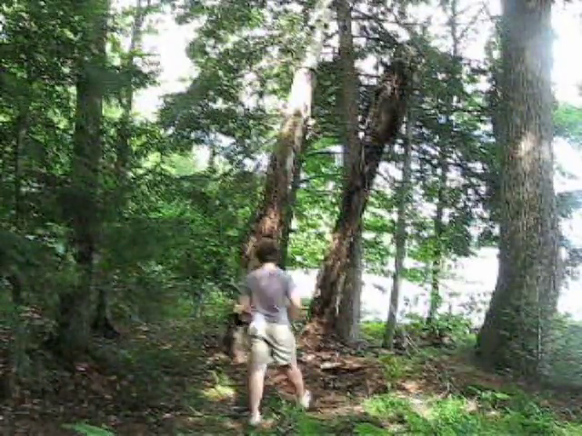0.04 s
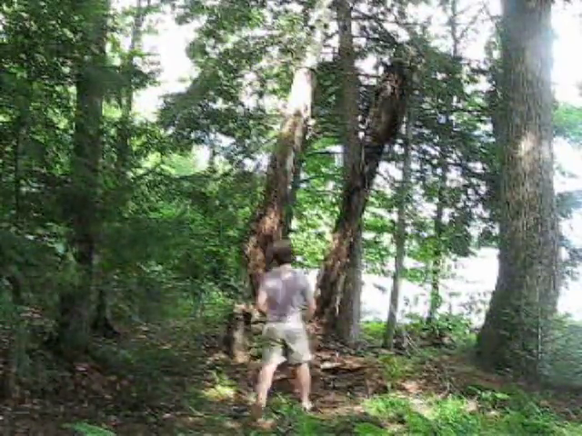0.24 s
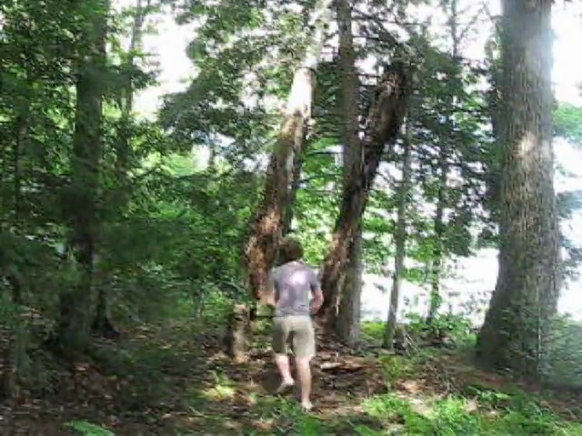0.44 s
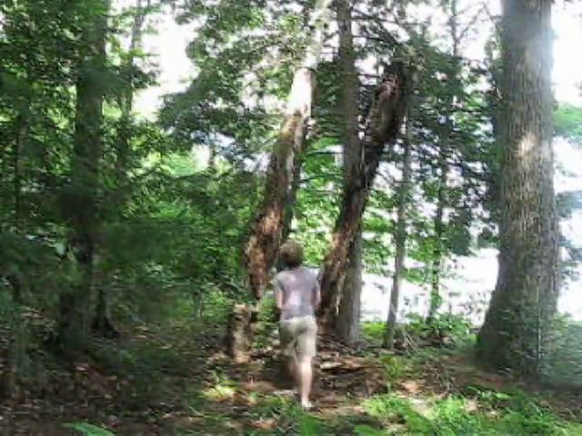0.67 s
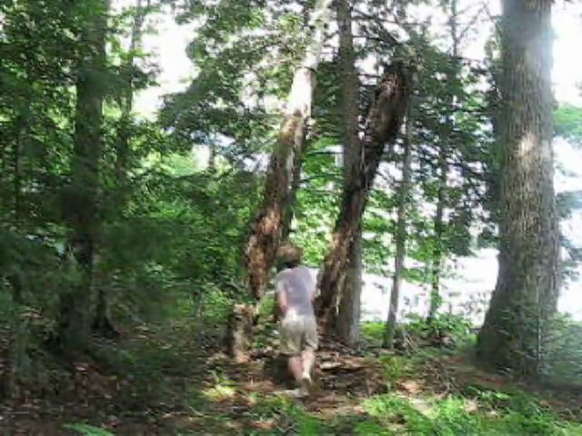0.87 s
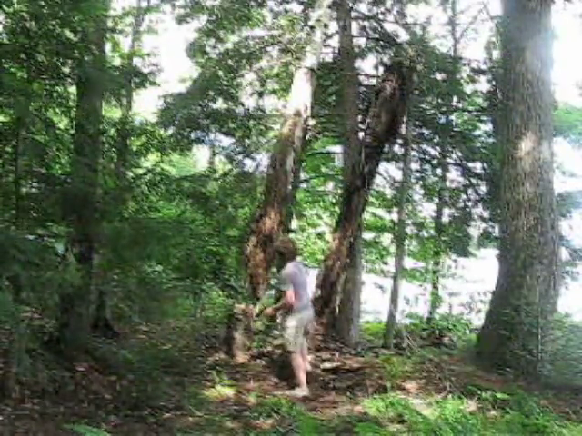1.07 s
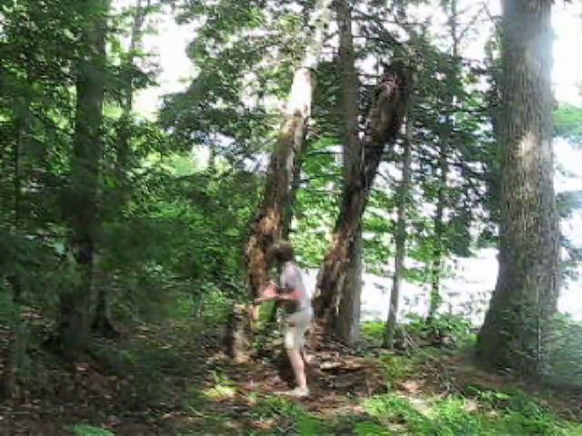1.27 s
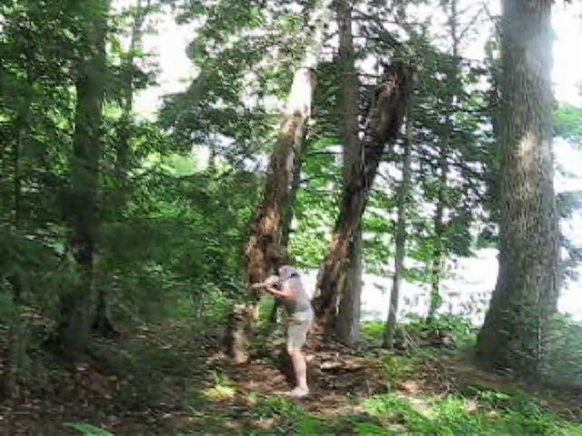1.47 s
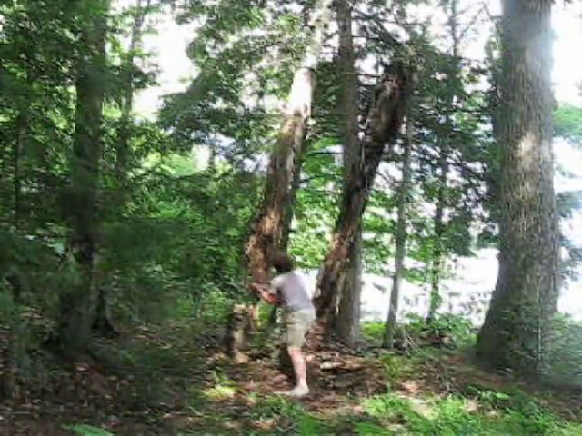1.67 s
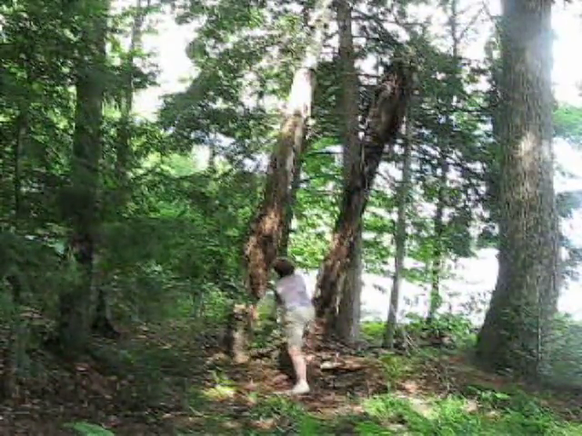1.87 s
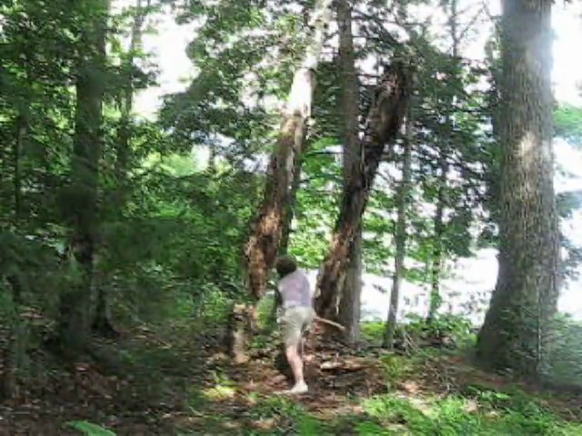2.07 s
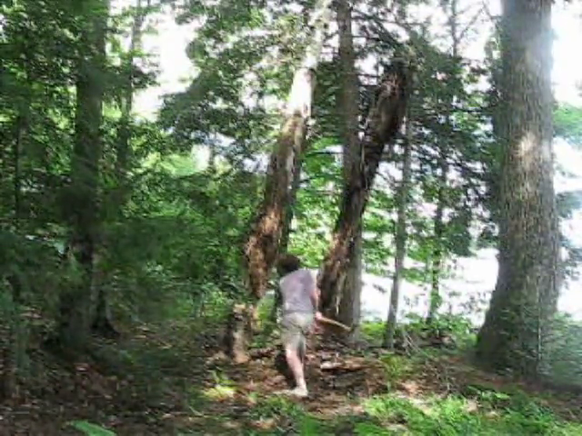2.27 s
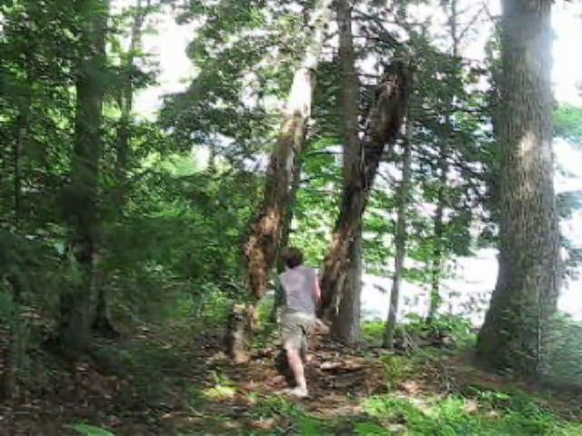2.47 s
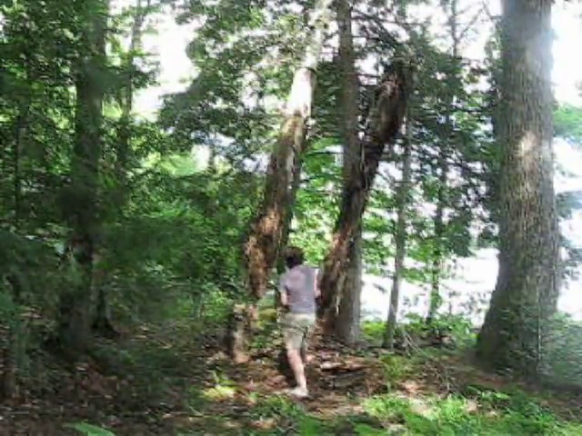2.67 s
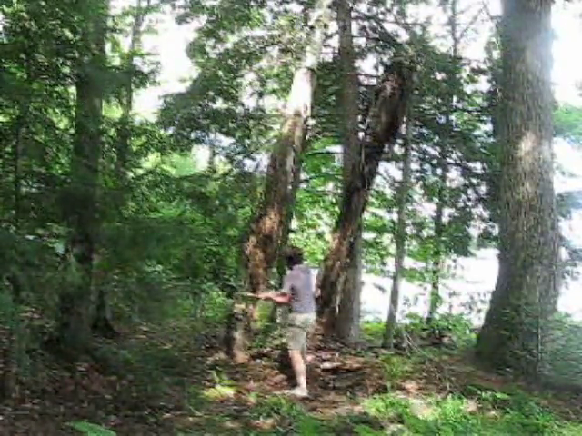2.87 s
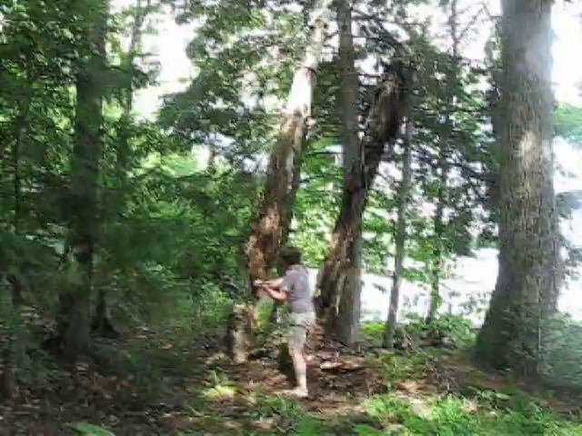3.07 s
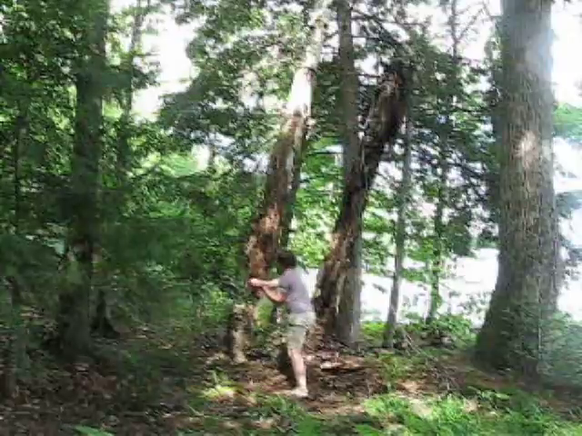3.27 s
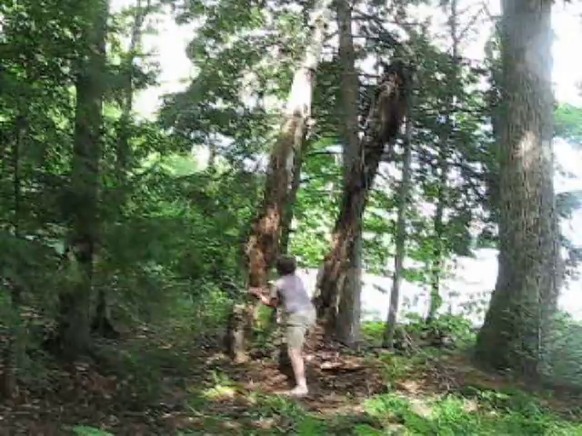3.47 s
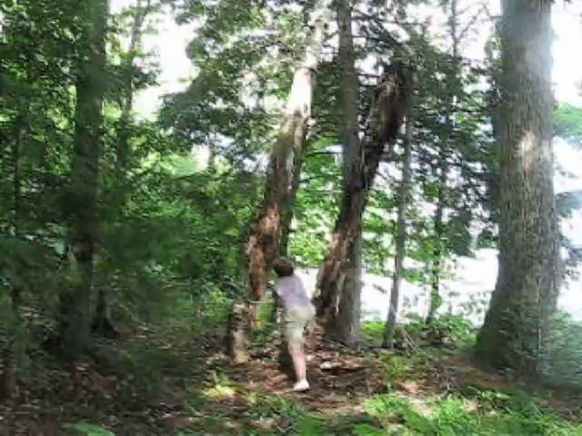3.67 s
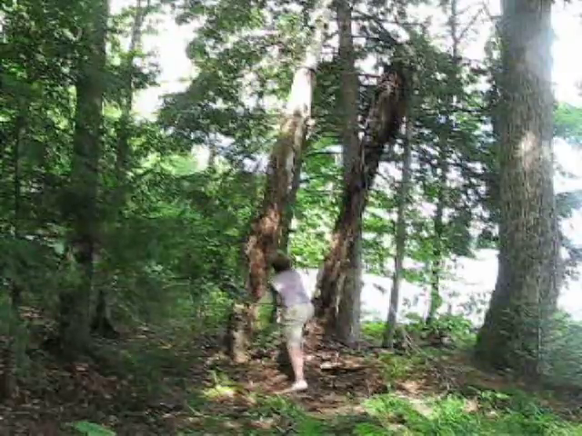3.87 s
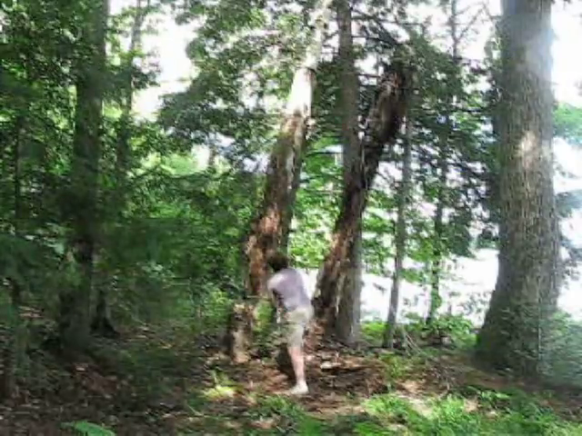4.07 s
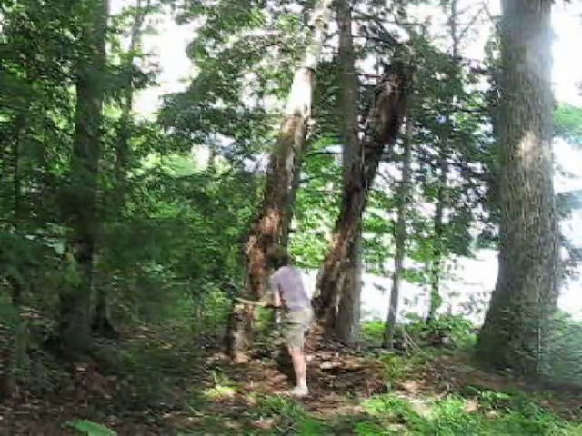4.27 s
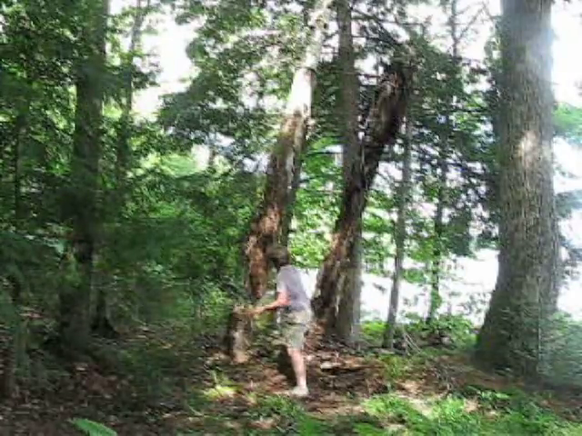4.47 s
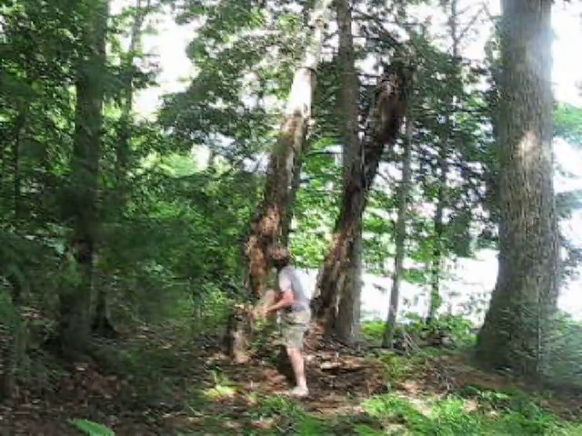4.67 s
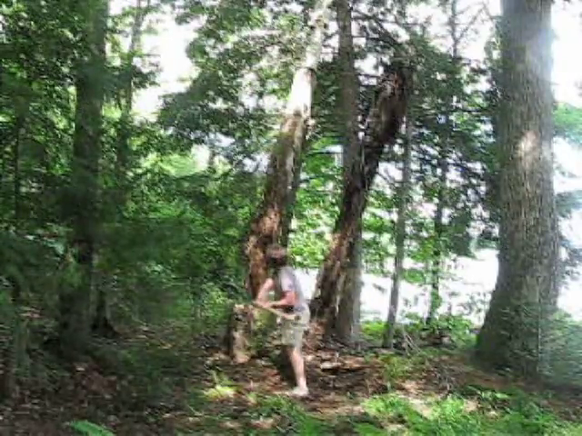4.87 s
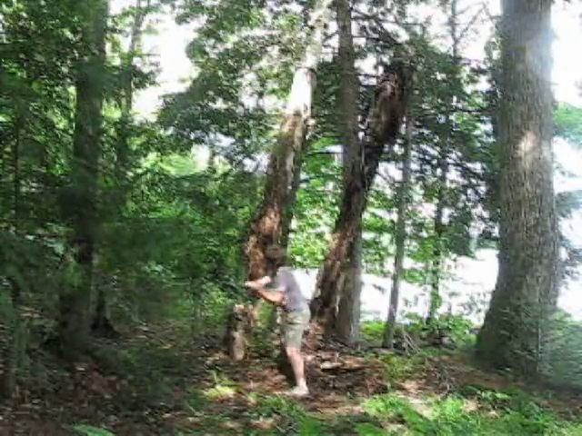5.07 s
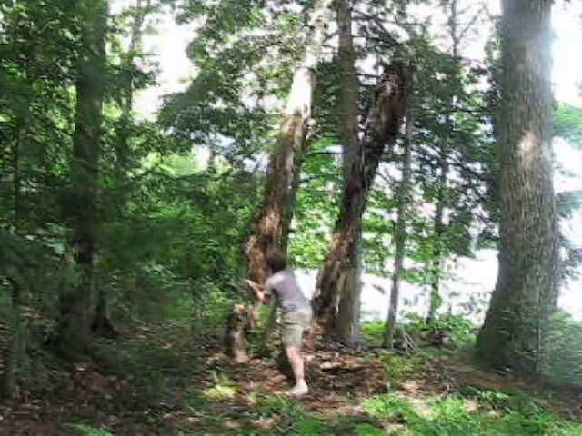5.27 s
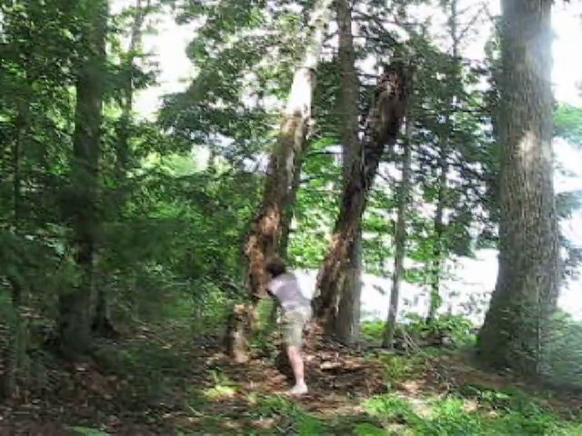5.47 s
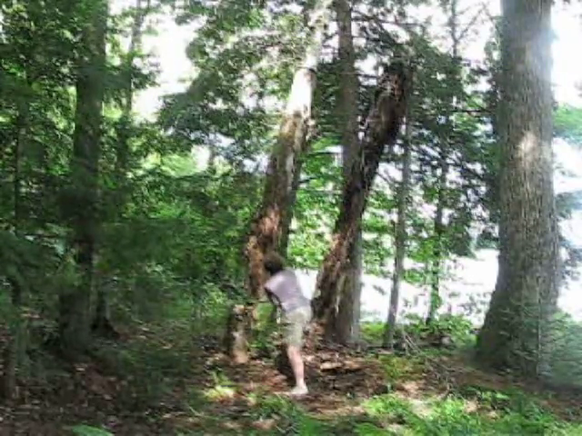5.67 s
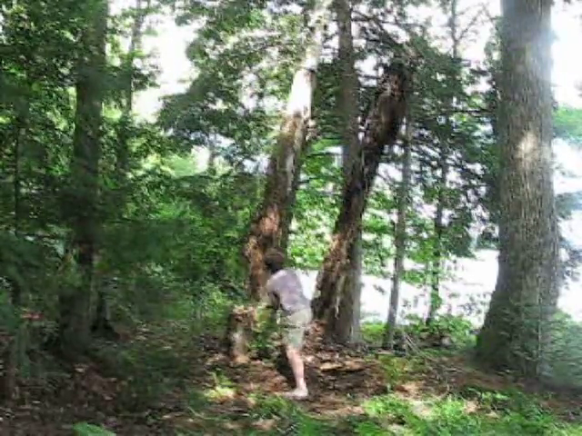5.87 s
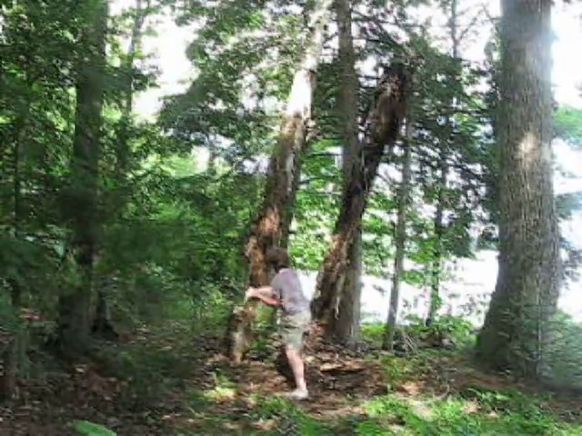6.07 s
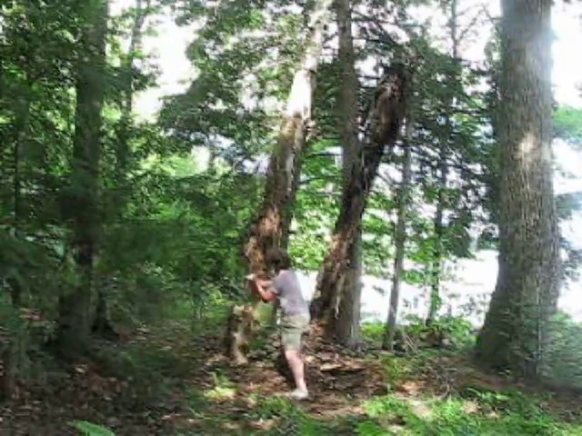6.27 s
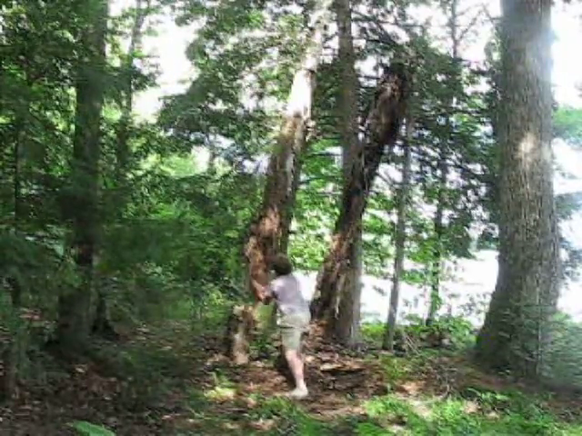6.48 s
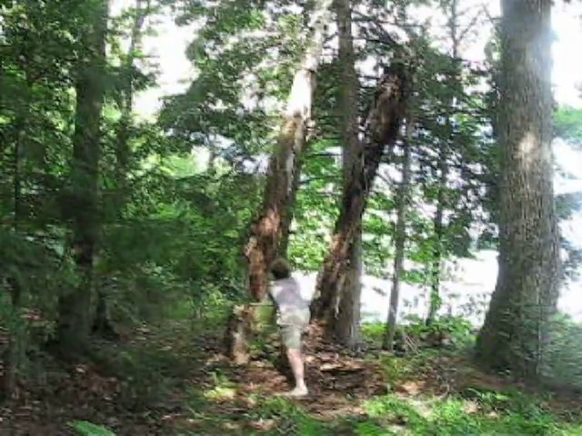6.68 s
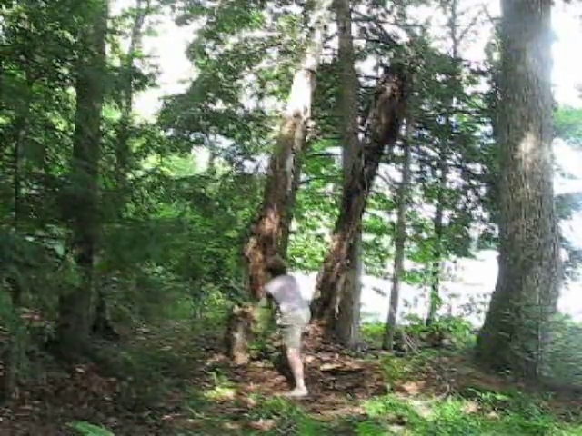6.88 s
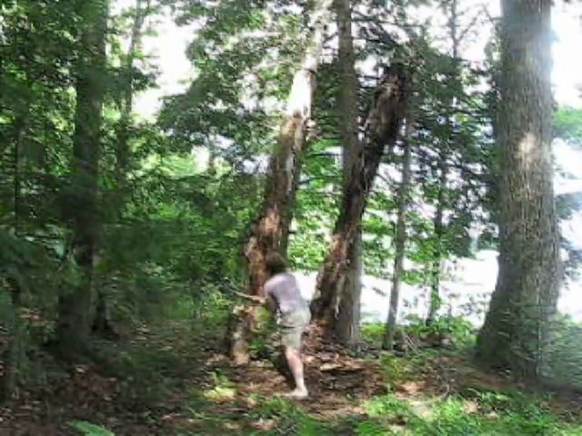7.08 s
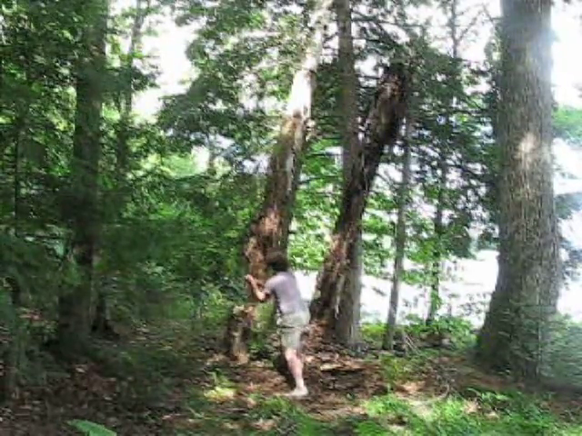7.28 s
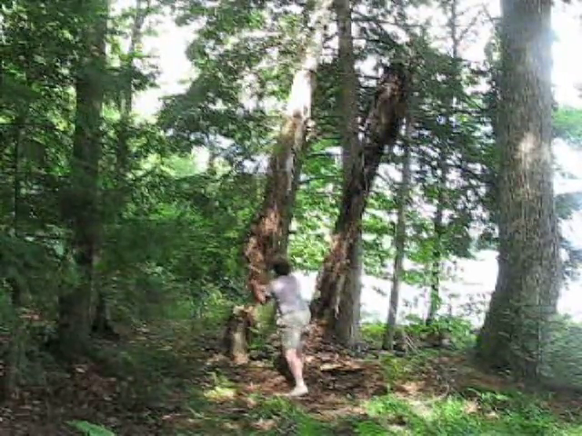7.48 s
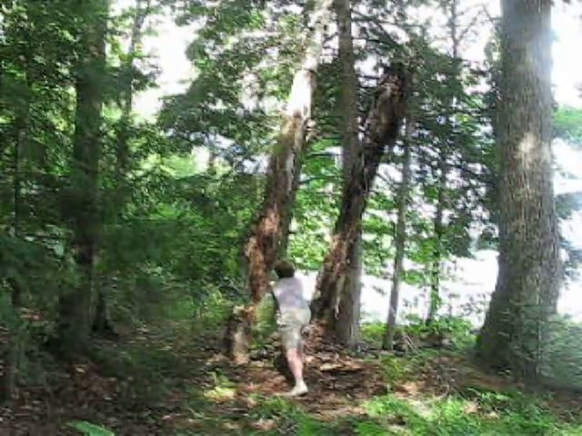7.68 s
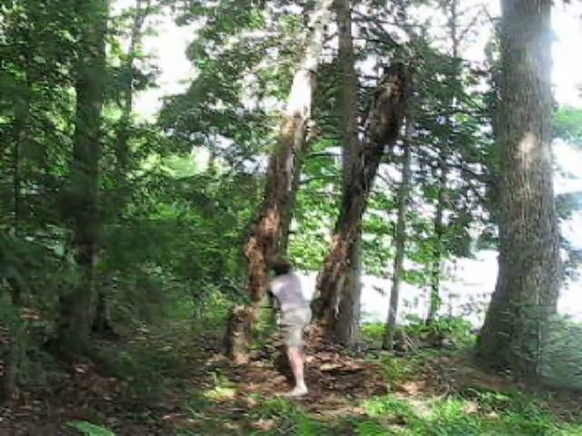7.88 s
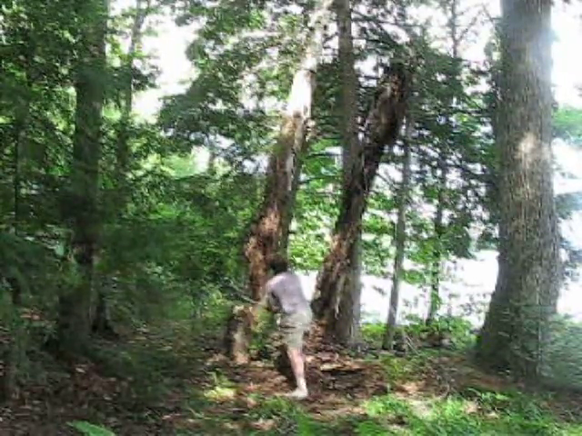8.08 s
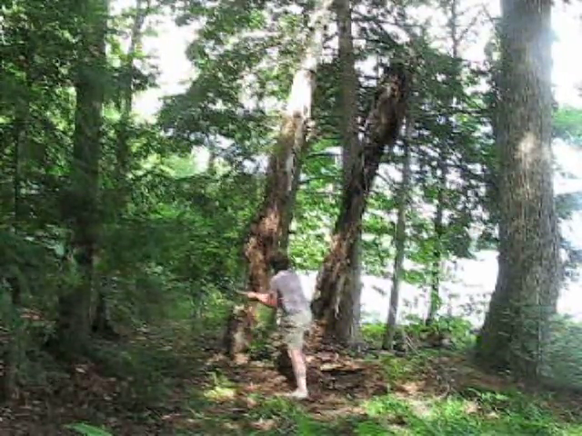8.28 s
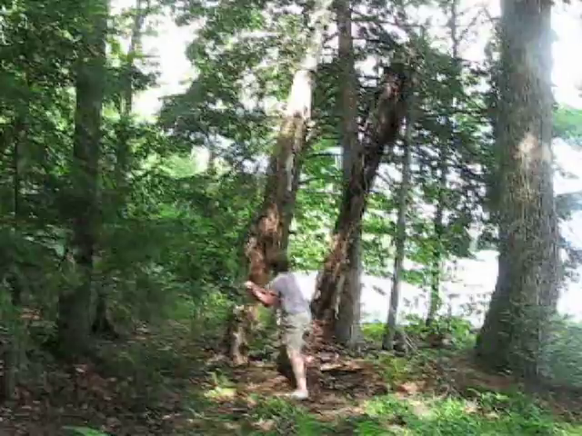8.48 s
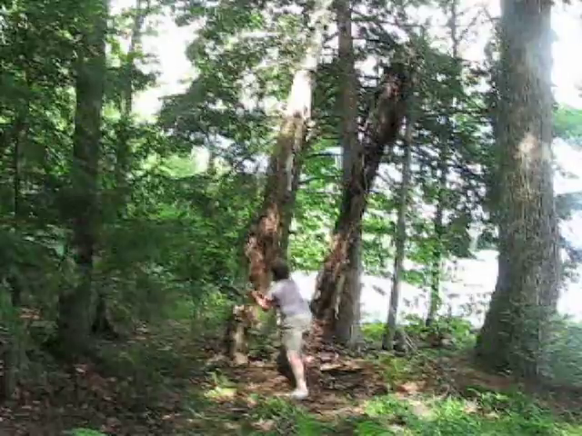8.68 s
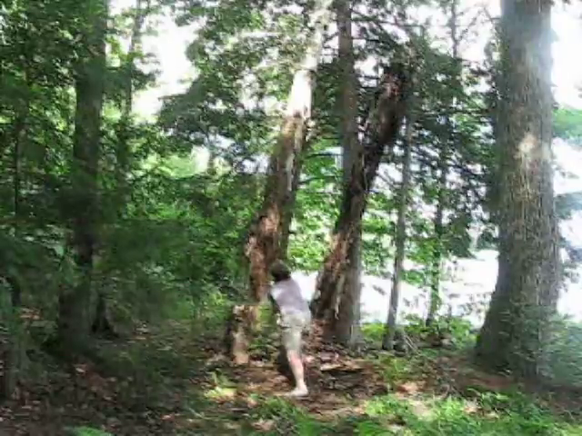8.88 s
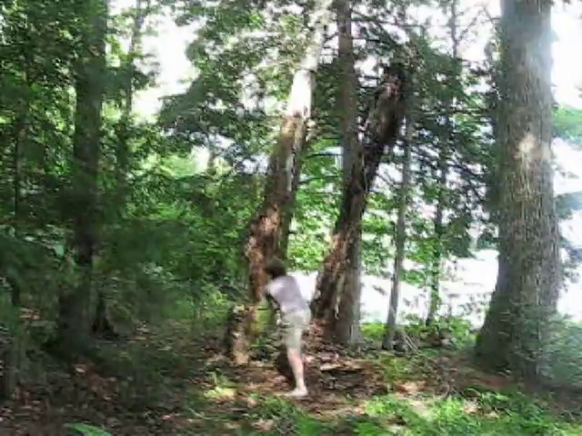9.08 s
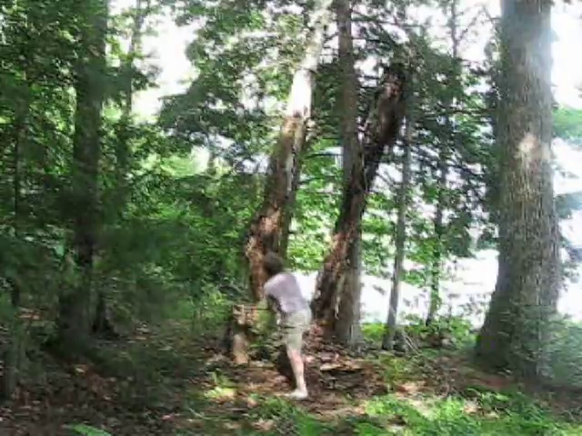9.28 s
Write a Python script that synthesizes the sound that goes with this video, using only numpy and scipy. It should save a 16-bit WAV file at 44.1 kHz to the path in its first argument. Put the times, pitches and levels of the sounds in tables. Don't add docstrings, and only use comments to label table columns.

```python
import sys
import numpy as np
from scipy import signal
from scipy.io import wavfile

SR = 44100
rng = np.random.default_rng(int(sys.argv[2]) if len(sys.argv) > 2 else 0)


def transcribe(u):
    v = np.clip(np.atleast_2d(u).T, -1, 1)
    q = np.round(v * 32767).astype(np.int16)
    wavfile.write(sys.argv[1], SR, q)


def how_loud(loudness_db):
    steps = np.asarray(loudness_db, float) / 20
    return 10 ** steps


N = 411894

# (time [s], crack level [dB], tearing length [ms], ring frequency [Hz], thud level [dB])
CRACKS = [(1.8725, -13, 2.9, 8200, -46), (1.876, -9, 2.1, 2360, -14.5), (3.6642, -11, 3.66, 3900, -24),
          (3.664, -12.5, 3.2, 1760, -42), (3.6818, -11.5, 2.8, 2770, -6), (5.4892, -17, 4.5, 8200, -40),
          (5.495, -8, 1.2, 5000, -29), (5.4973, -15, 2.7, 1840, -9), (5.542, -35, 1.2, 2720, -35),
          (5.611, -36, 5.5, 2470, -28), (6.6695, -13.5, 1.5, 3100, -8), (6.6688, -5.5, 1.86, 3780, -12),
          (7.7030, 0, 1.12, 4350, -8), (7.7034, -14, 1.14, 750, -27), (8.8783, -11.5, 1.66, 1860, -55),
          (8.8872, -5.5, 2.45, 4260, -7), (8.8947, -15, 0.81, 3000, -32)]
# (time [s], splintering sent among the trees [dB], shaking of the crown [dB])
BITES = [(1.8745, -5, -49.5), (3.6639, -7.5, -55), (3.6819, -7.5, -44.5), (5.492, -6, -54),
         (5.543, -11, -60), (5.6097, -18.5, -52), (6.6667, -5.5, -80), (7.701, -6, -77), (8.877, -6.5, -70),
         (8.8867, -9, -53), (8.8945, -3.5, -60)]


def rms_one(x):
    return x / np.sqrt(np.mean(x ** 2) + 1e-20)


def in_time(rows, size=N):
    s, *columns = np.transpose(rows)
    return [np.interp(np.arange(size) / SR, s, c) for c in columns]


def at_hz(points, hz):
    points_hz, points_db = np.transpose(points)
    return np.interp(np.log(hz), np.log(points_hz), points_db)


def drift(rate):
    every = 40
    r = np.exp(-2 * every * np.pi * rate / SR)
    white = rng.standard_normal(N // every + 2002)
    slow = signal.lfilter([1], [1, -2 * r, r * r], white)[2000:]
    return np.interp(np.arange(N) / every, np.arange(len(slow)), rms_one(slow - slow.mean()))


def ring(x, hz, t60):
    r = how_loud(-60 / (t60 * SR))
    w = 2 * np.pi * min(hz, 0.45 * SR) / SR
    return signal.lfilter([0, np.sin(w)], [1, -2 * r * np.cos(w), r * r], x)


def band(x, low_hz, high_hz, order=2):
    edges = [low_hz, min(high_hz, 0.45 * SR)]
    return signal.sosfilt(signal.butter(order, edges, "band", fs=SR, output="sos"), x)


def bands(low_hz, count, size):
    white = rng.standard_normal((2, size))
    edges = low_hz * 2 ** (np.arange(count + 1) / 2)
    pairs = zip(edges, edges[1:])
    return [(np.sqrt(a * b), band(white[k % 2], a, b)) for k, (a, b) in enumerate(pairs)]


def add(track, s, sound):
    i = round(s * SR)
    track[i:i + len(sound)] += sound[:N - i]


def snaps(rows):
    out, t = np.zeros(N), np.arange(SR // 20) / SR
    for s, db, hz, cycles in rows:
        burst = rng.standard_normal(len(t)) * np.exp(-t / 0.0016)
        snap = ring(burst, hz, max(cycles, 0.6) * 4.9 / hz)
        add(out, s, how_loud(db) * snap / np.abs(snap).max())
    return out


def leaves():
    # (time [s], level [dB])
    breeze = [(0, -51), (.45, -53.5), (.85, -51.5), (1.7, -52), (3.0, -52.5), (3.7, -53.5), (4.35, -48),
              (4.6, -52.5), (5.2, -54.5), (6.3, -50.5), (7.6, -50.5), (8.55, -49), (9.34, -50)]
    # (frequency [Hz], level [dB per Hz])
    foliage = [(150, -35), (250, -5.5), (444, -2.5), (906, 2), (1160, -2.5), (1640, 0), (2810, -3.5),
               (3840, -4.5), (12500, -11.5), (14200, -16), (16000, -25)]
    hiss_base_db, hiss_rise_db_per_s, hiss_follows = -59, 0.67, 0.14
    shake_s, shake_hiss_db = 0.31, -17.5

    breeze_db, = in_time(breeze)
    t, shaken = np.arange(N) / SR, np.zeros(N)
    for s, _, db in BITES:
        add(shaken, s, how_loud(db) ** 2 * np.exp(-t / shake_s))
    hiss_db = hiss_base_db + hiss_rise_db_per_s * t + hiss_follows * (breeze_db - breeze_db.mean())

    together, low, high = drift(12.3), 0, 0
    for hz, noise in bands(229.3, count=13, size=N):
        flicker_db = 0.57 * together + 1.24 * drift(15)
        layer = how_loud(at_hz(foliage, hz) + flicker_db) * noise
        share = np.clip(np.log2(hz / 2000) / 1.93, 0, 1)
        low = low + (1 - share) * layer
        high = high + share * layer
    murmur = np.sqrt(how_loud(breeze_db) ** 2 + shaken)
    hiss = np.sqrt(how_loud(hiss_db) ** 2 + how_loud(shake_hiss_db) ** 2 * shaken)
    return murmur * rms_one(low) + how_loud(3.0) * hiss * rms_one(high)


def wind():
    # (time [s], half length [s], level [dB])
    gusts = [(0.0, .08, -46), (.3, 0.078, -58), (.6, 0.24, -50), (1.203, 0.089, -65), (1.552, 0.1, -49.5),
             (1.912, .19, -45.5), (2.48, 0.089, -50), (2.743, 0.22, -56), (3.097, 0.14, -46),
             (3.58, 0.092, -48.5), (4.101, 0.44, -43.5), (4.795, .15, -50.5), (5.112, 0.11, -48.5),
             (5.365, 0.073, -47.5), (5.73, 0.13, -44), (6.095, 0.19, -54), (6.456, 0.2, -58),
             (6.75, .1, -49), (7.004, 0.13, -73), (7.35, 0.12, -66), (7.554, .12, -52), (7.8, 0.24, -46.5),
             (8.34, 0.15, -43), (8.74, 0.16, -44.5), (9.1, 0.25, -50.5)]
    # (time [s], half length [s], change [dB])
    lulls = [
        (1.024, .05, -12),
        (2.18, .06, -5),
        (3.342, 0.14, -8.5),
        (4.488, 0.034, -3),
    ]
    # (time [s], peak level [dB], frequency [Hz])
    puffs = [(0.479, -35, 91), (0.713, -30, 75), (1.791, -22, 83), (2.06, -31, 112), (2.456, -31.5, 90),
             (3.121, -27, 90), (3.986, -28, 112), (4.257, -19, 130), (4.547, -39, 91), (4.691, -21.5, 71.5),
             (4.709, -18, 100), (4.721, -22, 143), (5.067, -35, 87), (5.829, -32, 123), (7.909, -26.5, 129),
             (8.25, -23.5, 100), (8.30, -32, 111)]
    # (frequency [Hz], level [dB per Hz])
    rumble_colour = [(12, -43), (20, -8), (65, -1), (140, 0.5), (180, -31), (310, -120)]
    calm_db, rumble_db = -68, -49.5
    rumble_follows = 0.5

    now = np.arange(N) / SR
    gust_power = sum(how_loud(db) ** 2 * np.exp(-2 * ((now - s) / half) ** 4) for s, half, db in gusts)
    gust = np.sqrt(how_loud(calm_db) ** 2 + gust_power)
    lumps_db = 2.0 * drift(5.5)
    rumble = 0
    for hz, noise in bands(18.5, count=5, size=N):
        rumble = rumble + how_loud(at_hz(rumble_colour, hz) + lumps_db + 4.6 * drift(15.6)) * noise
    flutter = how_loud(0.82 * lumps_db + 4.6 * drift(26)) * band(rng.standard_normal(N), 97.7, 179.0)
    rumble_gain = how_loud(rumble_db + 3.5) * (gust / how_loud(-53.5)) ** rumble_follows
    out = rumble_gain * rms_one(rumble) + gust * rms_one(flutter)
    out = out * how_loud(sum(db * np.exp(-((now - s) / half) ** 2) for s, half, db in lulls))

    t = np.arange(-0.05, 0.05, 1 / SR)
    kink = np.exp(-(t / 0.0032) ** 2) * np.cos(2 * np.pi * 230 * t)
    for s, db, hz in puffs:
        swell = np.exp(-(t * hz) ** 2) * np.cos(2 * np.pi * hz * t)
        add(out, s + t[0], how_loud(db - 6) * (swell + 0.5 * kink))
    return out


def bird():
    # (time [s], length [s], start frequency [Hz], end frequency [Hz], level [dB])
    calls = [(0.761, 0.015, 2830, 2750, -48), (.775, 0.07, 3785, 3090, -46.5),
             (.855, 0.056, 3000, 2810, -55), (.86, 0.08, 4340, 3950, -49), (0.932, 0.071, 4000, 3830, -58),
             (.90, 0.08, 5400, 5080, -54), (0.967, .065, 5200, 4720, -58), (2.912, 0.075, 7240, 7150, -62),
             (2.935, .025, 4200, 4000, -59), (3.035, 0.028, 4000, 3760, -57), (4.942, 0.1, 4070, 3200, -51),
             (5.143, 0.031, 5200, 5000, -59), (6.862, 0.055, 3880, 3470, -48.5),
             (6.905, .042, 3450, 2980, -54), (6.95, 0.07, 4500, 4020, -55), (7.033, 0.045, 5100, 4700, -58)]
    out = np.zeros(N)
    for s, length, from_hz, to_hz, db in calls:
        x = np.linspace(0, 1, round(length * SR))
        swell = np.sin(np.pi * x ** 2.8) ** 0.18
        phase = 2 * np.pi * np.cumsum(from_hz + (to_hz - from_hz) * x) / SR
        add(out, s, how_loud(db) * swell * np.sin(phase))
    low_pass = signal.butter(2, 260, fs=SR, output="sos")
    flutter = rms_one(signal.sosfilt(low_pass, rng.standard_normal(N)))
    rough = out * (0.8 + 0.9 * flutter)
    t = np.arange(SR // 8) / SR
    trail = rng.standard_normal(len(t)) * np.exp(-t / 0.022)
    return rough + how_loud(-23) * signal.fftconvolve(rough, trail)[:N]


def brush():
    # (time [s], half length [s], level [dB])
    swishes = [
        (0.93, 0.12, -49.5),
        (1.493, 0.073, -47),
        (2.744, 0.038, -53),
        (5.23, 0.28, -54),
        (6.11, 0.03, -44),
        (7.16, 0.044, -50),
    ]
    t = np.arange(N) / SR
    swell = sum(how_loud(db) * np.exp(-((t - s) / half) ** 4) for s, half, db in swishes)
    return swell * rms_one(band(rng.standard_normal(N), 1000, 11000, order=1))


def twigs():
    # (time [s], peak level [dB], frequency [Hz], ring length [cycles])
    ticks = [(.03, -45, 3180, 1.6), (.035, -32, 12500, 1.5), (.7987, -32, 3300, 1.1),
             (2.4876, -34, 7500, 2.5), (2.7026, -35, 4000, 2), (3.047, -37, 9000, 1.5),
             (3.293, -42, 6500, 1.5), (4.938, -34, 6650, 6), (5.014, -36, 8300, 4.2),
             (5.2105, -29, 9800, 4.5), (5.284, -35, 3800, 1.2), (5.429, -47, 5000, 2),
             (6.081, -43, 6000, 1.2), (7.129, -39, 6000, 5), (7.316, -27, 6840, 6.2),
             (7.461, -29, 6800, 2.7), (7.959, -29.5, 11000, 2), (8.27, -31.5, 2500, 0.56),
             (8.62, -33.5, 1490, 1.6), (9.309, -32, 12800, 2.6)]
    return snaps(ticks)


def footsteps():
    # (time [s], peak level [dB], frequency [Hz], ring length [cycles])
    steps = [
        (.698, -41, 900, 1.3),
        (.7985, -30, 1200, 1),
        (1.170, -38, 424, 6.3),
        (1.1705, -30, 1000, 0.55),
        (1.203, -41, 1080, 6),
        (8.271, -43, 704, 1.6),
    ]
    return snaps(steps)


def forest():
    # (frequency [Hz], level [dB])
    scatter_colour = [(130, 1), (300, 4), (600, 3.5), (1200, -3), (2500, -2.5), (4000, -3), (6000, -7.5),
                      (10000, -10.5), (13500, -13), (15500, -35)]
    arrive_s = 0.002
    near_db, near_s = 5, 0.0073
    hold_db, hold_s = -1.5, 0.077
    ring_db, ring_s, ring_wide_s = 1, 0.083, 0.021
    thin_db, thin_s = 22.5, 0.16

    t, out = np.arange(int(0.7 * SR)) / SR, np.zeros(N)
    shape_db = hold_db - 60 * np.clip(1 - t / arrive_s, 0, 1)
    shape_db += near_db * np.exp(-t / near_s)
    shape_db -= thin_db * (1 - np.exp(-np.clip(t - hold_s, 0, 1) / thin_s))
    shape_db += ring_db * np.exp(-((t - ring_s) / ring_wide_s) ** 2)
    grain_db = 1.8 * drift(160)
    for hz, noise in bands(112, count=15, size=N):
        lowness = 1 / (1 + (hz / 900) ** 2)
        early_db = 5.0 * lowness * np.exp(-t / 0.05)
        loss_db = (20.0 + 0.4 * hz / 1000) * t
        fade = how_loud(shape_db + early_db - loss_db) ** 2
        power = np.zeros(N)
        for s, *_, thud_db in CRACKS:
            add(power, s, fade * lowness * how_loud(thud_db + 1.5) ** 2)
        for s, sent_db, _ in BITES:
            add(power, s, fade * (1 - lowness) * how_loud(sent_db) ** 2)
        level_db = at_hz(scatter_colour, hz) + grain_db + 0.67 * drift(30)
        out += how_loud(level_db) * np.sqrt(power) * noise
    return how_loud(-15.5) * out


def chips():
    # (time [s], peak level [dB], frequency [Hz], ring length [cycles])
    chip_hits = [
        (5.5115, -16, 3800, 2.6),
        (5.5422, -14.5, 2580, 1.9),
        (5.5602, -18, 1970, 1.5),
        (5.5625, -34, 1500, 1.8),
        (5.6095, -15.5, 4120, 1.2),
        (5.6105, -22.5, 1530, 1.3),
        (5.6135, -21, 895, 0.93),
        (2.045, -26.5, 3300, 1.5),
    ]
    return snaps(chip_hits)


def knocks(push):
    # (echo lag [s], level [dB])
    near_trunks = [(.0052, -5), (.012, -3), (.0205, -7), (.030, -6), (.0355, -7), (.044, -9), (.055, -10),
                   (.066, -14), (.08, -17)]
    lags, levels_db = np.transpose(near_trunks)
    uneven_lags = lags + rng.normal(0, 0.001, len(lags))
    taps = np.zeros(len(push))
    taps[(uneven_lags * SR).astype(int)] = how_loud(levels_db + rng.normal(0, 0.88, len(lags)))
    return band(signal.fftconvolve(push, taps)[:len(push)], 260, 620, order=1)


def blows():
    # (frequency [Hz], level [dB], decay time t60 [s])
    trunk = [(158, -33, 0.16), (213, -11.5, 0.17), (291, -3.5, 0.093), (415, -0.5, 0.063), (618, 4, 0.037),
             (790, -4, 0.077), (960, 3, 0.034)]
    direct, t = np.zeros(N), np.arange(SR // 8) / SR
    push = -np.sin(np.pi * np.clip(t / 0.00054, 0, 1))
    for s, crack_db, ms, hz, thud_db in CRACKS:
        tearing = np.clip(t / 0.00042, 0, 1) * np.exp(-np.clip(t - ms / 1000, 0, 1) / 0.00028)
        splinters = band(rng.standard_normal(len(t)) * tearing, 1200, 18000, order=1)
        crack = 0.7 * splinters + 0.38 * ring(splinters, hz, 4.5 / hz)

        strengths_db = rng.normal(0, 1.9, len(trunk))
        modes = 0
        for (mode_hz, db, t60), more_db in zip(trunk, strengths_db):
            modes = modes + how_loud(db + more_db) * ring(push, mode_hz, t60)
        thud = 0.42 * push + 0.018 * modes
        add(direct, s, how_loud(crack_db) * crack + how_loud(thud_db) * (thud + knocks(push)))
    return band(direct, 112, 13500)


def scene():
    background = leaves() + wind() + bird() + brush() + twigs() + footsteps()
    mono = background + forest() + chips() + blows()
    return np.array([mono, mono])


def band_limit(x):
    return signal.sosfilt(signal.butter(12, 16670, fs=SR, output="sos"), x)


def record(dry):
    ceiling = 0.54
    limited = ceiling * np.tanh(dry / ceiling)
    low_pass = signal.cheby2(8, 50, 16700, fs=SR, output="sos")
    return band_limit(signal.sosfilt(low_pass, limited))


dry = scene()
out = record(dry)
transcribe(out)
```